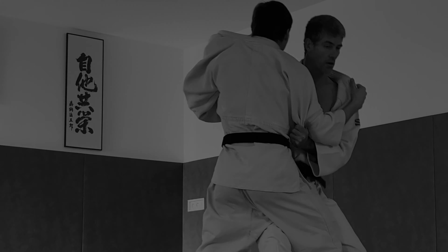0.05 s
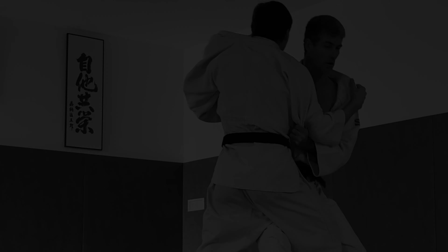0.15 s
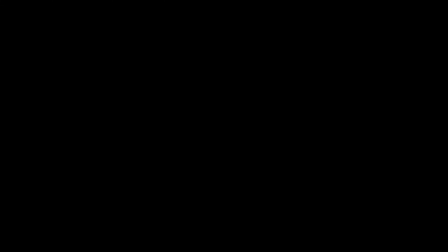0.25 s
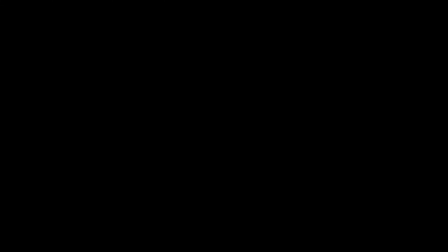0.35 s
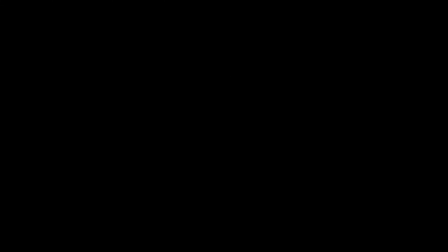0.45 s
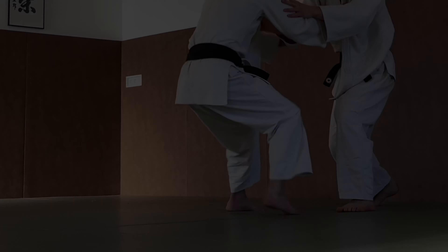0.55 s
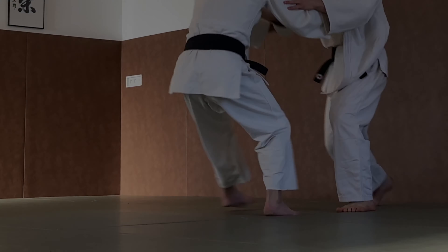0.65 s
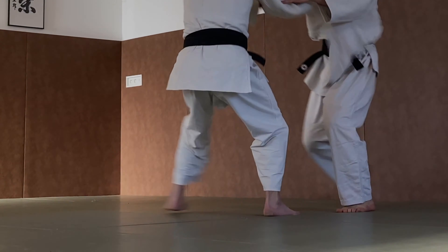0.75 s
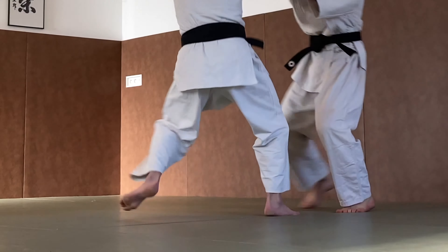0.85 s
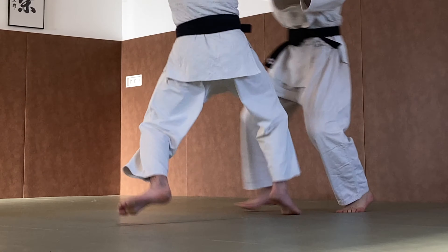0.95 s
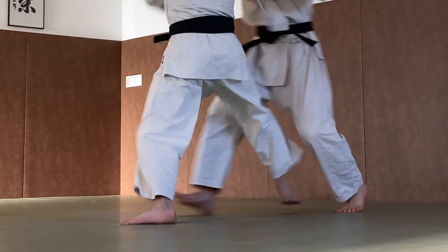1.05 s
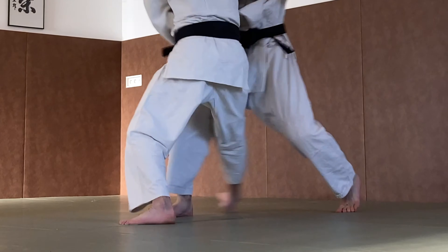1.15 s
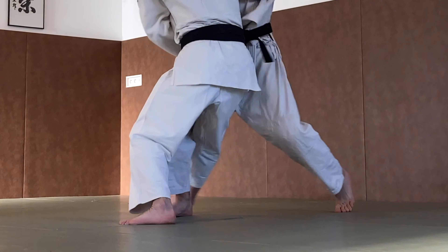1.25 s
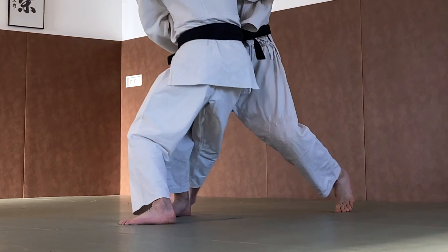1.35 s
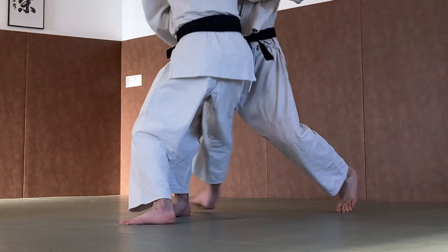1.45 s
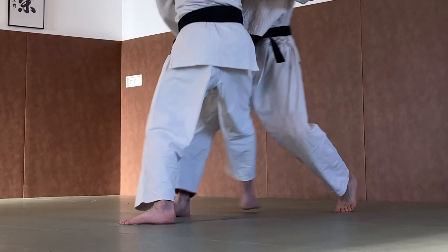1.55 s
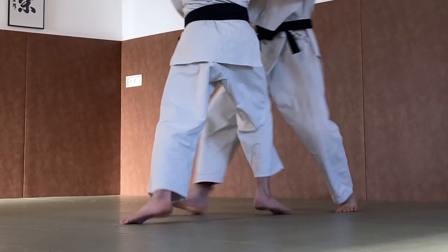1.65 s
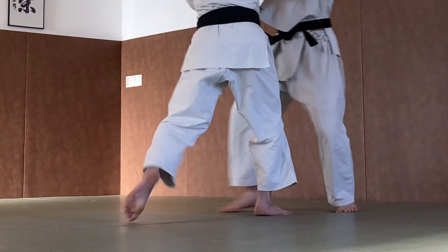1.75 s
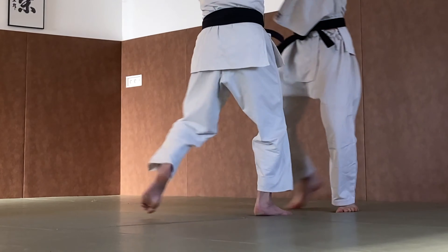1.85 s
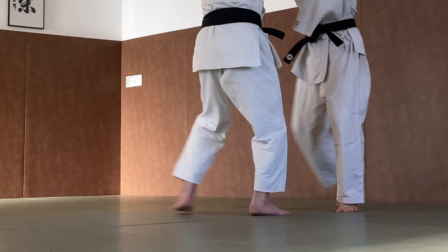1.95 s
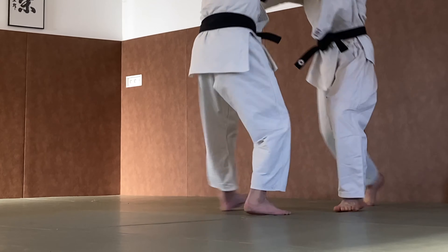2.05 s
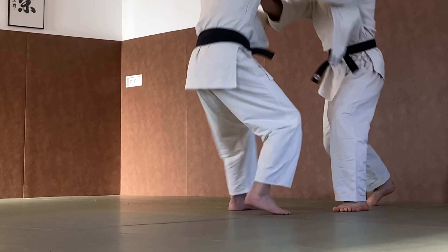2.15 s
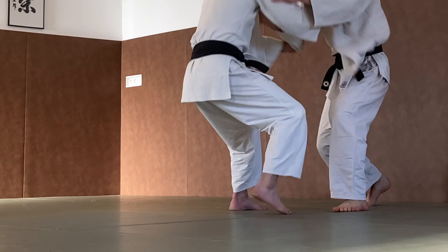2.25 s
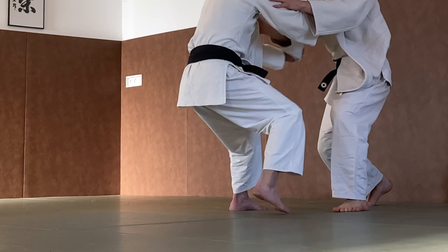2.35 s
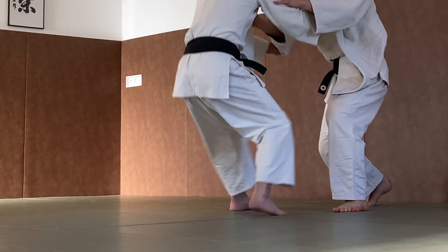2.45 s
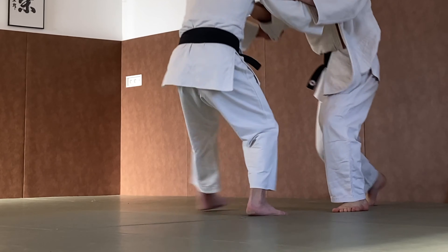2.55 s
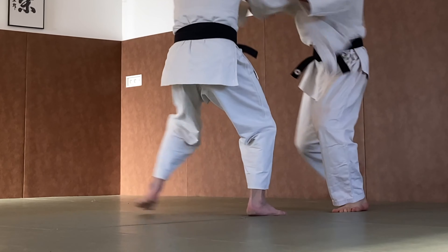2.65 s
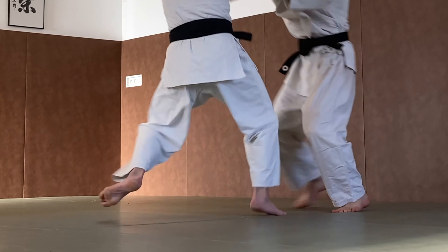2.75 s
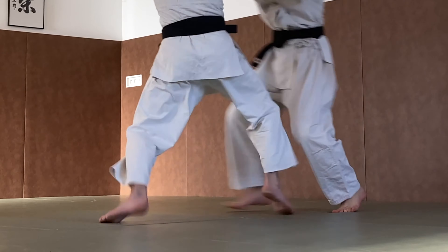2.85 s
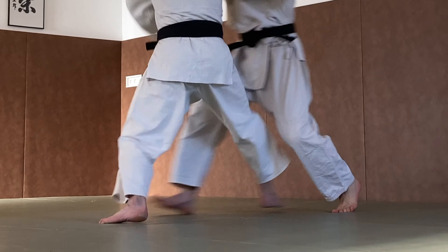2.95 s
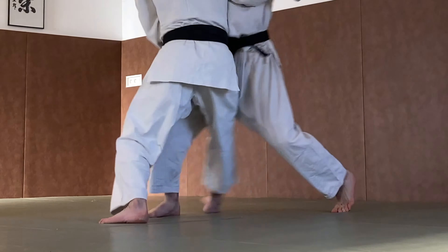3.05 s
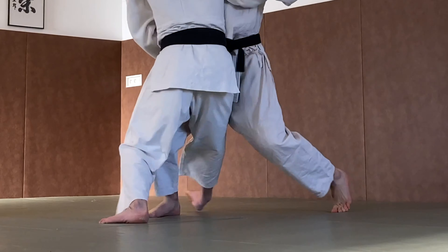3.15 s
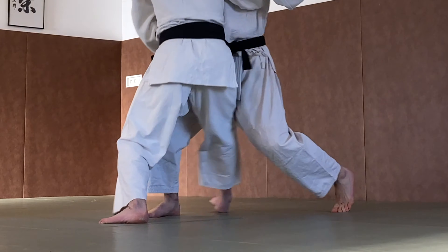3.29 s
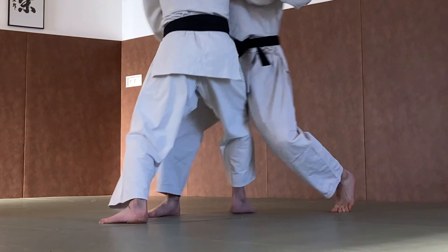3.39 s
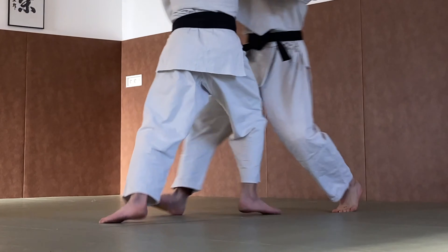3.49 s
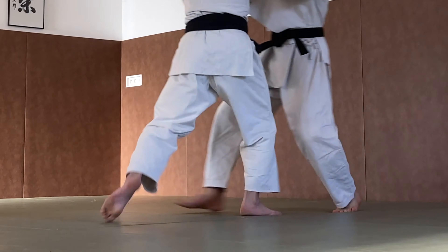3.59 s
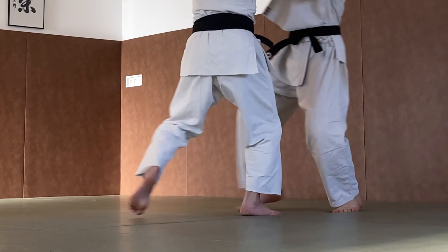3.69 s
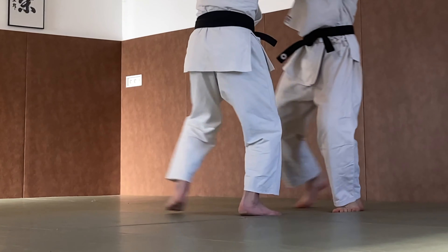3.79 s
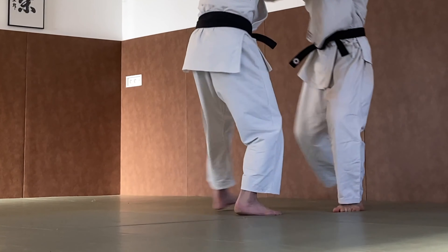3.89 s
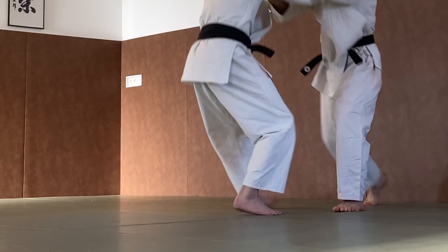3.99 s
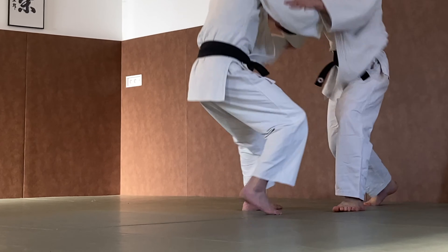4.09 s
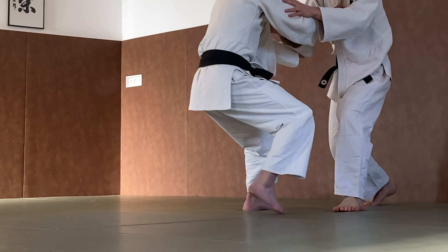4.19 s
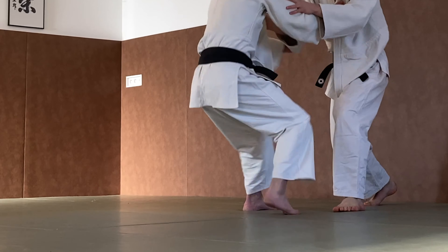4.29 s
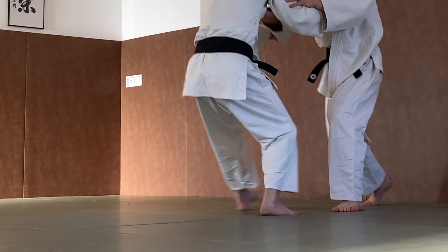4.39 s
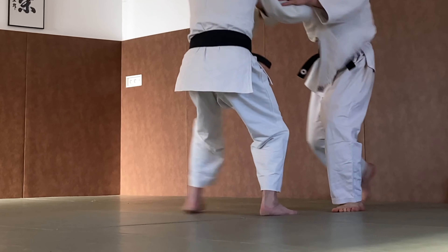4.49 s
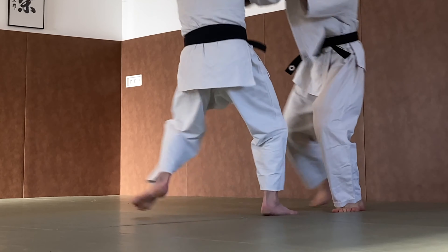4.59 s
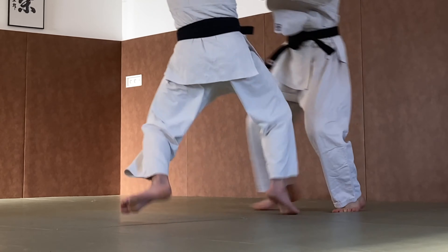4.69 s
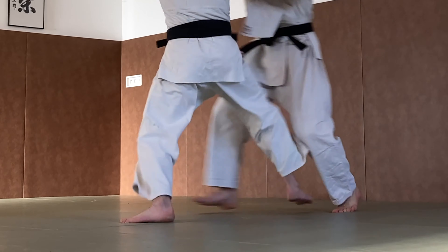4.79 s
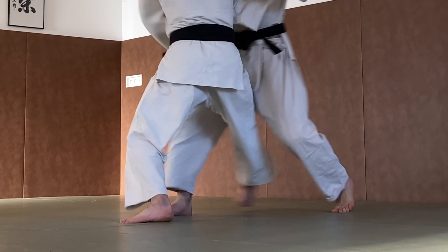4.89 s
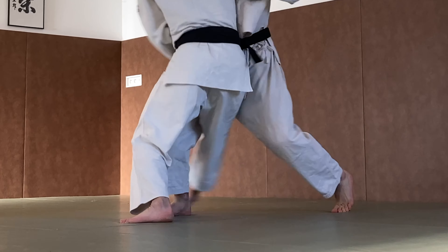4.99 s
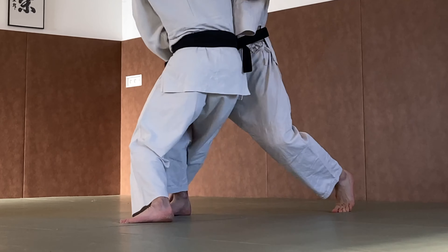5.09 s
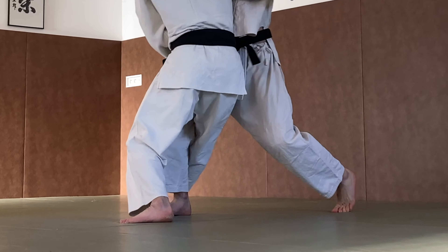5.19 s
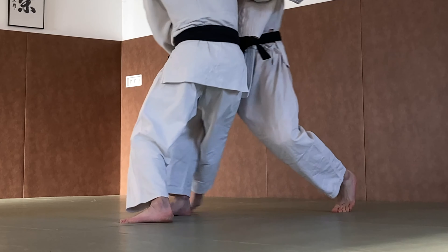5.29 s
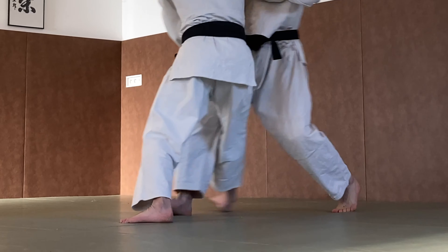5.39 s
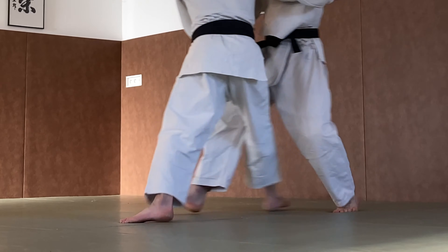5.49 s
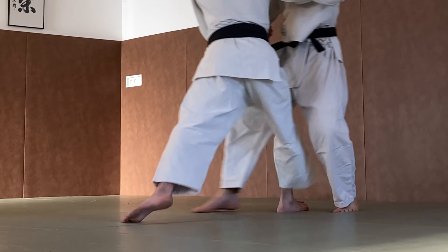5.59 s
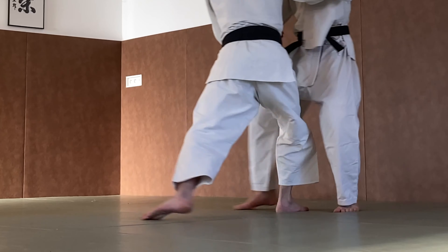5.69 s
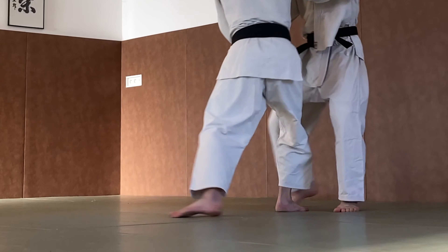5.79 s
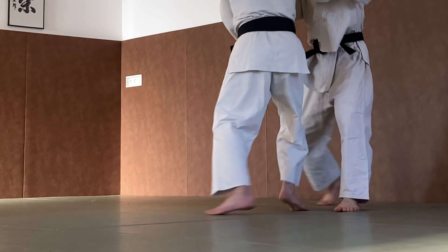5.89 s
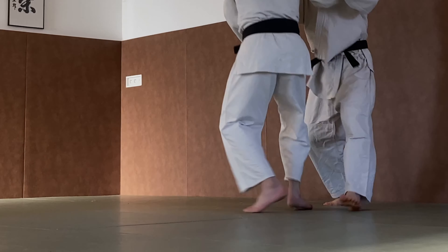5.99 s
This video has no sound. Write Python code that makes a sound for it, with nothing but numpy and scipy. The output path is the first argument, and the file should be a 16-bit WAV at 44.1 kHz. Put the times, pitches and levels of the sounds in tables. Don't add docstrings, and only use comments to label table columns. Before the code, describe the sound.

Two barefoot grapplers drill on a padded vinyl mat in a bare, live hall. The sound fades in quickly on quiet scuffs and cloth rustle. Three heavy heel stamps, about two seconds apart, boom deeply and slap into the hall, the first loudest. Between them come soft steps, hissing soles, creaking floor and tiny dry snaps. The stereo microphone is a few metres away.

```python
import sys
import numpy as np
from scipy import signal
from scipy.fft import rfft, irfft
from scipy.io import wavfile
from scipy.ndimage import uniform_filter1d

SR = 44100
rng = np.random.default_rng(int(sys.argv[2]) if len(sys.argv) > 2 else 0)


def master(y):
    cut = np.clip(np.atleast_2d(y).T, -1, 1)
    pcm = np.round(cut * 32767)
    wavfile.write(sys.argv[1], SR, pcm.astype(np.int16))


def voltage_ratio(decibels):
    exponent = np.asarray(decibels, float) / 20
    return 10 ** exponent


N = 266220

# t/s, weight-shifting level/dB, jacket-pull level/dB
EFFORT = [(0.2, -51.5, -54), (0.55, -61.5, -62), (0.8, -50, -57), (1.1, -47.5, -51.5), (1.52, -57, -65),
          (1.73, -44.5, -51.5), (2.02, -58, -58), (2.2, -47.5, -51.5), (2.5, -55.5, -59.5),
          (2.95, -45.5, -52), (3.3, -65, -53.5), (3.6, -47.5, -49), (3.94, -69, -58.5), (4.121, -46.5, -55),
          (4.28, -61, -58), (4.7, -48, -55.5), (5.33, -61.5, -54.5), (5.7, -54.5, -51.5)]
# f/Hz, density/dB
RUMBLE_COLOUR = [(20, -58), (30, -43), (45, -30), (62, -1), (85, 0.5), (160, -3), (250, -6), (350, -15.5),
                 (600, -22.5), (1200, -43)]
# f/Hz, density/dB
JACKET_COLOUR = [(200, 13), (500, 3.5), (1200, 7.5), (2500, 3.5), (4500, -0.5), (8000, -10), (16000, -33)]
# f/Hz, density/dB
SOLE_COLOUR = [(1500, -16), (3500, -5.5), (6000, -7), (8000, -1), (11000, 0.4), (13000, -3.5), (15000, -4),
               (16500, -15.5)]
# start t/s, speeding up/s, gliding/s, hiss level/dB
SLIDES = [(0.0, 0.01, 0.13, -53), (0.16, 0.068, .02, -64), (0.56, 0.044, 0.21, -67.5),
          (0.78, 0.12, 0.052, -56.5), (1.02, 0.1, .07, -52), (1.62, .12, 0.043, -51),
          (1.8, 0.082, 0.087, -55), (2.03, 0.04, 0.034, -51.5), (2.42, 0.1, 0.14, -70),
          (2.72, 0.088, .2, -58), (3.22, 0.14, 0.089, -55.5), (3.38, 0.047, .02, -51),
          (3.65, .035, .12, -52.5), (3.8, .05, 0.12, -60), (4.29, 0.022, .01, -62),
          (4.41, 0.064, 0.018, -51.5), (4.62, 0.065, 0.13, -54.5), (5.14, 0.1, 0.068, -51.5),
          (5.26, 0.12, 0.039, -45), (5.61, 0.1, 0.075, -49), (5.78, 0.089, 0.089, -51),
          (5.92, 0.086, .1, -49.5)]
# t/s, peak level/dB, centre f/Hz
SNAPS = [(0.4524, -50, 7000), (1.017, -28, 9500), (1.0195, -32, 3000), (1.0552, -30, 8500),
         (1.6876, -38, 7000), (2.2515, -36, 1200), (2.875, -31, 7000), (2.9232, -28, 9000),
         (4.5505, -36, 1200), (4.798, -27, 11000), (5.618, -34, 700), (5.6253, -33, 7000)]
# t/s, boom peak level/dB, centre f/Hz
DROPS = [
    (0.601, -41, 79),
    (0.82, -33, 81.4),
    (2.429, -45, 77.5),
    (1.05, -34, 80),
    (2.749, -40.5, 81.6),
    (4.2, -48.5, 82.4),
    (4.785, -29.5, 83.5),
    (5.75, -55, 88),
    (5.98, -42, 80),
]
# t/s, boom peak level/dB, slap level/dB, brightness/(dB per octave), boom centre f/Hz
STEPS = [(0.248, -54, -49.5, -4.5, 195), (0.414, -44, -52.5, -2, 67), (0.613, -41, -68, 3, 202),
         (0.797, -27, -37, -4, 233), (1.016, -27.5, -42, 0, 175), (1.723, -31, -40, -1.5, 84),
         (1.935, -40.5, -53, -6, 218), (2.109, -41.5, -40.5, -1.5, 87), (2.263, -36.5, -38, -4, 104),
         (2.331, -43, -64, -5, 85), (2.668, -30.5, -34.5, -3.5, 85.5), (2.76, -35, -66, -13, 173),
         (2.874, -24.5, -44, -0.5, 160), (3.549, -40, -45, -9, 184), (3.852, -44, -54.5, -8, 236),
         (4.028, -32, -38, -1, 205), (4.402, -34.5, -47.5, -2, 183), (4.547, -41.5, -42.5, -3, 88),
         (4.755, -27, -39.5, -1, 187), (5.564, -36, -47, 0, 136), (5.625, -29, -41, 3.5, 89.6),
         (5.652, -34, -49, 15, 101), (5.901, -38, -62, -16, 102), (5.966, -33, -60, -11, 176)]
# f/Hz, level over the slap/dB, t60/s
MAT_KNOCK = [(346, -1, 0.061), (463, -5.5, 0.12), (657.6, -0.5, 0.085), (1000, -4.5, 0.07)]
# f/Hz, signed strength, t60/s
FLOOR_MODES = [(68.8, 0.08, 1.0), (72.2, -0.3, 0.8), (84.6, 0.61, 0.62), (89.1, 1.0, 0.73),
               (91.7, -0.8, 0.47), (100.2, -0.44, 0.63), (108.7, 0.2, 1.0), (121.4, 0.2, 0.53),
               (128.6, -0.74, 0.34), (140.9, -0.58, 0.48), (149.2, 0.33, 0.6), (155.6, -0.81, 0.38),
               (160.4, 0.35, 0.57), (174.3, 0.67, 0.47), (181.2, 0.4, 0.2), (208.7, 0.41, 0.43),
               (223.1, -0.61, 0.15), (246.9, 0.44, 0.34), (254.0, -0.26, 0.58), (270.5, -0.06, 0.67),
               (288.0, -0.19, 0.53), (307.1, 0.15, 0.52), (316.6, -0.23, 0.31), (329.8, 0.21, 0.31),
               (353.4, 0.21, 0.37), (385.1, 0.1, 0.15), (423.5, 0.08, 0.51), (468.6, 0.05, 0.73),
               (505.0, 0.06, 0.15)]
# t/s, peak level/dB, boom brightness/(dB per octave)
HEELS = [
    (1.1381, -2.5, -.2),
    (3.0236, -4.5, 2.0),
    (4.9054, -5.3, 1.7),
]
# t/s, echo level/dB, brightness/(dB per octave), crack over echo/dB, arch hollowness
STAMPS = [
    (1.1355, -10, 3, 22, 1.6),
    (3.0207, -14.5, 2.17, 24.5, 0.88),
    (4.902, -17, 1.5, 23, 0.064),
]
# f/Hz, density/dB
SLAP_COLOUR = [(180, -34), (300, -1), (652, -7), (2210, -13.5), (7250, -21.5), (8840, -19), (10600, -21.5),
               (11300, -23.5), (13800, -27), (15500, -34)]
# f/Hz, width/Hz, level/dB
ARCH_AIR = [(670, 150, -8), (1504, 83, 2), (2260, 750, 3.5), (2530, 37, -14), (3480, 420, -7.5)]
# f/Hz, t60/s
HALL_DECAY = [(250, 1), (500, 0.49), (900, 0.83), (2000, 0.9), (5000, 1), (10000, 0.66), (16000, 0.5)]
# f/Hz, likeness (0 to 1)
LIKENESS = [(60, 0.77), (200, 1), (330, 0.72), (600, 0.087), (5500, 0.066), (7000, 0.78), (9000, 0.56)]
# low f/Hz, high f/Hz, polarity
SHARED_BANDS = [(8500, 9700, -1), (10950, 11900, 1), (13050, 14400, -1), (15250, 17000, 1)]


def evened(x):
    return x / np.sqrt(np.mean(x ** 2) + 1e-20)


def read(points, hz):
    f, value = np.transpose(points)
    return np.interp(np.log(hz + 1), np.log(f + 1), value)


def add(mix, s, sound):
    part = mix[..., round(s * SR):][..., :sound.shape[-1]]
    part += sound[..., :part.shape[-1]]


def coloured(x, points, tilt_db=0):
    hz = np.fft.rfftfreq(x.shape[-1], 1 / SR)
    gain_db = read(points, hz) + tilt_db * np.log2((hz + 200) / 2000)
    return irfft(rfft(x) * voltage_ratio(gain_db), x.shape[-1])


def stroke(rise_s, hold_s, fade_db_per_s, curve):
    t = np.arange(SR) / SR
    swell = np.clip(t / max(rise_s, 0.005), 0, 1) ** curve
    return swell * voltage_ratio(-fade_db_per_s * np.maximum(t - rise_s - hold_s, 0))


def rustle(points, size, patchy_db, flicker_db):
    hz = np.fft.rfftfreq(size, 1 / SR)
    frames = N // (size // 4) + 5
    a, b, c, d, patches = rng.standard_normal((frames, len(hz), 5)).T
    patches = uniform_filter1d(patches, size=8, axis=0)
    patches = evened(uniform_filter1d(patches, size=12, axis=1))
    flicker = evened(uniform_filter1d(rng.standard_normal(frames), size=3))
    same = np.clip(read(LIKENESS[:5], hz), 0, 1)[:, None]
    left = a + 1j * b
    right = same * left + np.sqrt(1 - same ** 2) * (c + 1j * d)
    gain_db = read(points, hz)[:, None] + patchy_db * patches + flicker_db * flicker
    z = np.array([left, right]) * voltage_ratio(gain_db)
    return evened(signal.istft(z, nperseg=size, noverlap=3 * size // 4)[1][:, :N])


def floor_rumble():
    s, floor_db, _ = np.transpose(EFFORT)
    level = voltage_ratio(np.interp(np.arange(N) / SR, s, floor_db))
    return level * rustle(RUMBLE_COLOUR, size=2048, patchy_db=1.5, flicker_db=0.7)


def jackets():
    s, _, jacket_db = np.transpose(EFFORT)
    power = voltage_ratio(2 * np.interp(np.arange(N) / SR, s, jacket_db))
    for s, echo_db, *_ in STAMPS:
        flap = voltage_ratio(-28.5 + 0.69 * echo_db) * stroke(0.11, 0.013, fade_db_per_s=187, curve=0.23)
        add(power, s, flap ** 2)
    return np.sqrt(power) * rustle(JACKET_COLOUR, size=512, patchy_db=3.0, flicker_db=-0.1)


def sliding_soles():
    power = np.zeros(N)
    for s, rise_s, hold_s, db in SLIDES:
        slide = voltage_ratio(db) * stroke(rise_s, hold_s, fade_db_per_s=73, curve=1.28)
        add(power, s, slide ** 2)
    grain_db = 4.8 * np.minimum(rng.exponential(1, (2, N)), 2.8)
    grains = voltage_ratio(grain_db) * (rng.random((2, N)) < 600 / SR)
    crackle = evened(coloured(grains * rng.choice([-1.0, 1.0], N), SOLE_COLOUR))
    hiss = rustle(SOLE_COLOUR, size=256, patchy_db=1.7, flicker_db=0.8)
    return np.sqrt(power) * (hiss + 0.38 * crackle)


def snaps():
    out, t = np.zeros((2, N)), np.arange(400) / SR
    for s, db, hz in SNAPS:
        noise = rng.standard_normal(400) + 0.5 * rng.standard_normal((2, 400))
        tick = coloured(noise * np.exp(-t / 0.0004), [(hz / 4, -12), (hz, 0), (17000, -6)])
        add(out, s, voltage_ratio(db) * tick / abs(tick.mean(0)).max())
    return out


def struck(hz, t60, rise_s):
    t = np.arange(SR) / SR
    return np.sin(2 * np.pi * hz * t) * voltage_ratio(-60 * t / t60) * (1 - np.exp(-t / rise_s))


def ringing():
    hz, _, t60 = np.transpose(FLOOR_MODES)
    t = np.arange(round(0.9 * SR))[:, None] / SR
    return np.sin(2 * np.pi * hz * t) * voltage_ratio(-60 * t / t60)


def damped_ringing():
    rings = ringing()
    quick = voltage_ratio(-25.0 * np.arange(len(rings)) / SR)[:, None]
    return (rings * quick)[:30000]


def right_weights():
    hz = np.transpose(FLOOR_MODES)[0]
    return voltage_ratio(1.25 - 0.005 * (hz - 70)) + (hz / 400) ** 2 * rng.standard_normal(len(hz))


def boom(rings, strength, right):
    pair = np.array([rings @ (strength * (2 - right)), rings @ (strength * right)])
    pushed = signal.oaconvolve(pair, np.hanning(150)[None])
    pushed = signal.lfilter(*signal.butter(2, 60, "hp", fs=SR), pushed)
    return pushed / abs(pushed.mean(0)).max()


def hall_tail(soft_ms, early, size):
    t = np.arange(size) / SR
    hz, frame_s, z = signal.stft(rng.standard_normal((2, size)), SR, nperseg=256)
    patches = uniform_filter1d(rng.standard_normal(z.shape[1:]), size=3, axis=0)
    patches = evened(uniform_filter1d(patches, size=9, axis=1))
    z = z * voltage_ratio(1.3 * patches - 60 * frame_s / read(HALL_DECAY, hz)[:, None])
    tail = signal.istft(z, SR, nperseg=256)[1][:, :size]
    tail *= 1 - np.exp(-t / (0.00037 + soft_ms / 1000))
    return tail * (1 + early * np.exp(-t / 0.0062))


def contact(soft_ms, cupped, size):
    t = np.arange(size) / SR
    lasts = 0.0005 + soft_ms / 3000
    flat = round(lasts * SR * 2)
    burst = rng.standard_normal(size) * t / lasts * np.exp(-t / lasts)
    pop = np.sin(2 * np.pi * 1900 * t) * np.exp(-t / 0.0007)
    burst += 1.1 * cupped * np.roll(pop, flat)
    burst[flat] += 4 * (soft_ms == 0)
    direct = burst + 0.35 * np.roll(burst, 130) + 0.4 * np.roll(burst, 290)
    pair = np.array([np.roll(direct, 4), 0.8 * direct])
    return pair / np.sqrt(1 + 2 * soft_ms)


def slap(tilt_db, soft_ms, direct_db, cupped, early, size):
    mixed = hall_tail(soft_ms, early, size) + voltage_ratio(direct_db) * contact(soft_ms, cupped, size)
    sound = coloured(mixed, SLAP_COLOUR, tilt_db) * voltage_ratio([[0.5], [-0.5]])
    hz = np.fft.rfftfreq(size, 1 / SR)
    hollow = 1 + cupped * sum(voltage_ratio(db) / (1 + 2j * (hz - centre) / width) for centre, width, db in ARCH_AIR)
    t = np.arange(size) / SR
    sound = irfft(rfft(sound) * hollow, size) * np.clip(8 * (0.97 - t / t[-1]), 0, 1)
    return sound / np.sqrt(np.mean(sound[:, SR // 100:SR // 20] ** 2))


def weight_drops(right):
    out, damped = np.zeros((2, N)), damped_ringing()
    hz, strength, _ = np.transpose(FLOOR_MODES)
    late_booms = [(s + 0.23, db - 21.5, 145) for s, db, _ in HEELS]
    for s, db, centre_hz in DROPS + late_booms:
        near = np.exp(-(np.log2(hz / centre_hz) / 0.37) ** 2)
        add(out, s, voltage_ratio(db) * boom(damped, strength * near, right))
    return out


def light_steps(right):
    out, damped = np.zeros((2, N)), damped_ringing()
    hz, strength, _ = np.transpose(FLOOR_MODES)
    for s, boom_db, slap_db, tilt_db, centre_hz in STEPS:
        soft_ms = min(3.2 + 1.5 * (-39.5 - slap_db), 7.7)
        near = 0.37 + np.exp(-(np.log2(hz / centre_hz) / 0.44) ** 2)
        spot = strength * (1 + 0.63 * rng.standard_normal(len(hz))) * near
        add(out, s + 0.0037, voltage_ratio(boom_db) * boom(damped, spot, right))
        sole = slap(tilt_db, max(soft_ms, 0.1), direct_db=13.2, cupped=0.031, early=0.81, size=20480)
        add(out, s, voltage_ratio(slap_db - 5.0) * sole)
        knock = sum(voltage_ratio(slap_db + db) * struck(f, t60, 0.012) for f, db, t60 in MAT_KNOCK)
        add(out, s, knock[None])
    return out


def stamps(right):
    out, rings = np.zeros((2, N)), ringing()
    hz, strength, _ = np.transpose(FLOOR_MODES)
    for s, db, tilt_db in HEELS:
        bright = voltage_ratio(tilt_db * np.log2(hz / 160) + 5 * (hz > 400))
        add(out, s, voltage_ratio(db) * boom(rings, strength * bright, right))
        heave = struck(43.2, t60=0.28, rise_s=0.02)
        add(out, s, voltage_ratio(db - 35) * heave[None])
    for s, echo_db, tilt_db, crack_db, cupped in STAMPS:
        sole = slap(tilt_db, 0, crack_db - 19.5, cupped, early=0.067, size=32768)
        add(out, s, voltage_ratio(echo_db - 13.5) * sole)
    return out


def scene():
    hush_db = np.interp(np.arange(N) / SR, [0, 0.1, 0.22, 0.245], [-30.0, -17.0, -9, 3.5])
    moving = floor_rumble() + jackets() + sliding_soles()
    right = right_weights()
    feet = weight_drops(right) + light_steps(right) + stamps(right)
    return moving * voltage_ratio(hush_db) + snaps() + feet


def joined_treble(left, right, hz, block):
    same = np.clip(read(LIKENESS, hz), 0, 1) * (hz > 5500)
    turn = same * np.exp(2j * np.pi * (hz - 7050) / 4330)
    joined = turn[:, None] * left + np.sqrt(1 - same ** 2)[:, None] * right
    for low, high, sign in SHARED_BANDS:
        shift = rng.choice([-250, 0, 0, 250], (2, len(block)))[:, block]
        band = (hz[:, None] >= low + shift[0]) & (hz[:, None] < high + shift[1])
        joined = np.where(band, sign * left, joined)
    return joined


def top_edge(left, hz, block):
    top = np.bincount(block, (abs(left[hz > 14400]) ** 2).sum(0))[block]
    masking = 1 + 600 * uniform_filter1d((abs(left) ** 2).sum(0), size=64)
    return np.clip(14000 + 7000 * top / np.median(top) / masking, 14900, 15900)


def top_cut(x):
    return signal.sosfilt(signal.butter(12, 17140, fs=SR, output="sos"), x)


def record(dry):
    hz, t, (left, right) = signal.stft(dry, SR, nperseg=256, noverlap=192)
    block = (np.arange(len(t)) + 9) // 16
    joined = joined_treble(left, right, hz, block)
    treble = uniform_filter1d((abs(left[hz > 5000]) ** 2).sum(0), size=3) + 1e-14
    click = treble > 5 * np.roll(uniform_filter1d(treble, size=6), 4)
    edge_hz = np.where(click, 16600, top_edge(left, hz, block))
    ports = np.array([left, np.where(click, right, joined)]) * (hz[:, None] < edge_hz)
    wave = signal.istft(ports, SR, nperseg=256, noverlap=192)[1][:, :N]
    wave = 1.2 * np.tanh(wave / 1.2)
    return top_cut(wave)


dry = scene()
out = record(dry)
master(out)
```